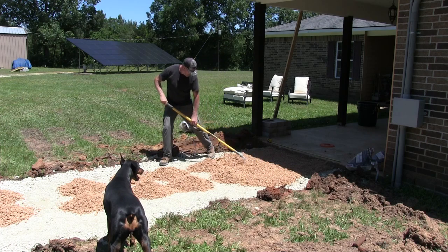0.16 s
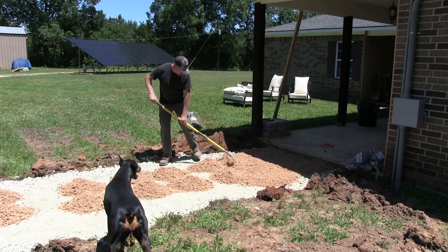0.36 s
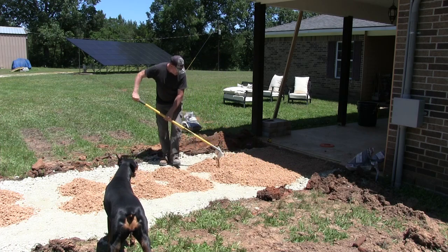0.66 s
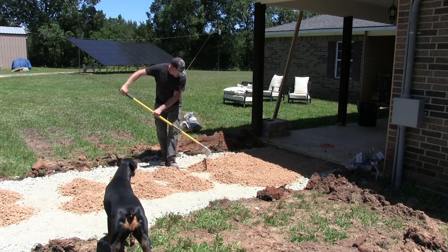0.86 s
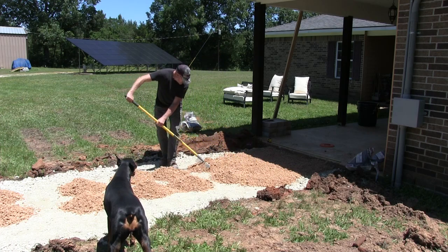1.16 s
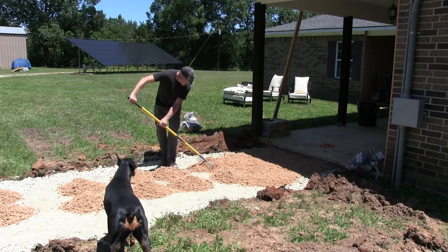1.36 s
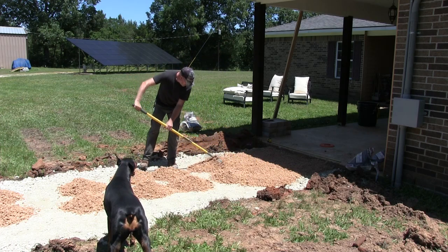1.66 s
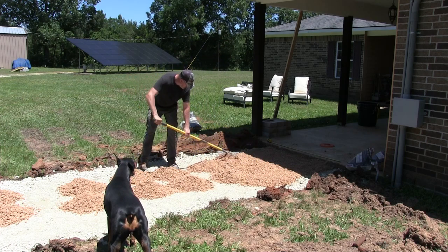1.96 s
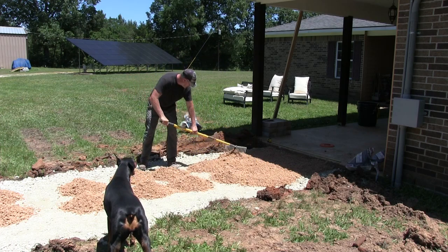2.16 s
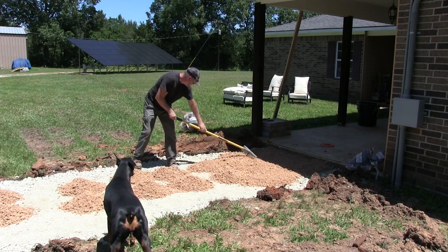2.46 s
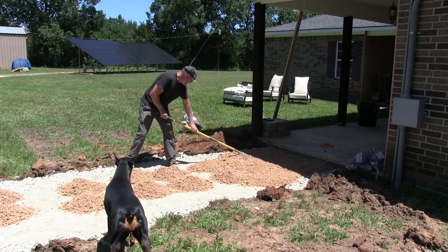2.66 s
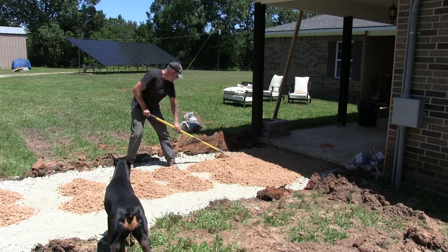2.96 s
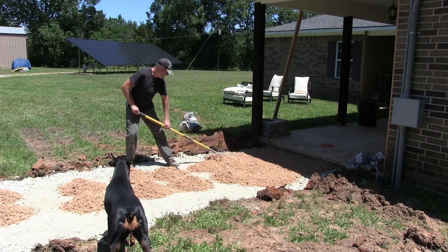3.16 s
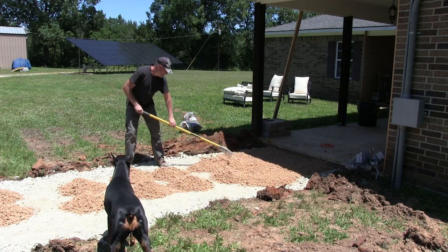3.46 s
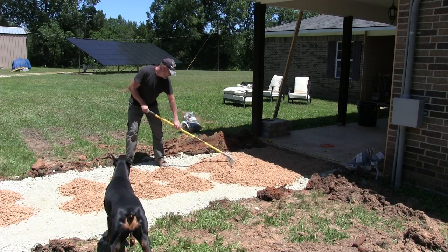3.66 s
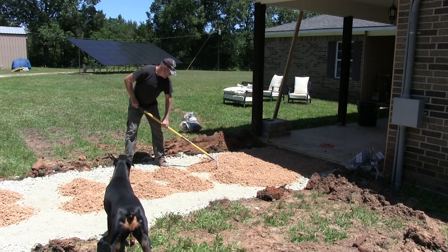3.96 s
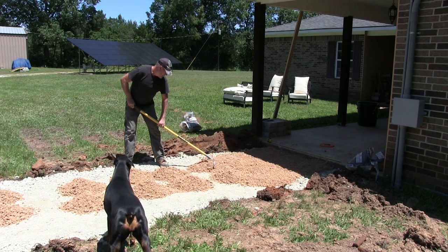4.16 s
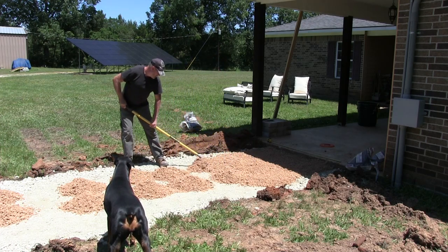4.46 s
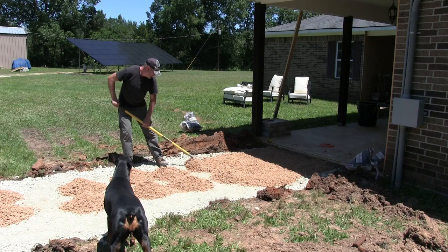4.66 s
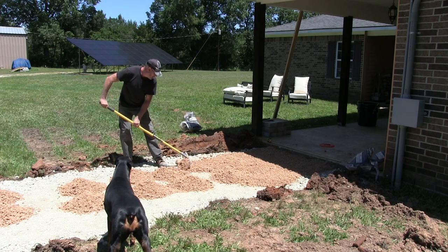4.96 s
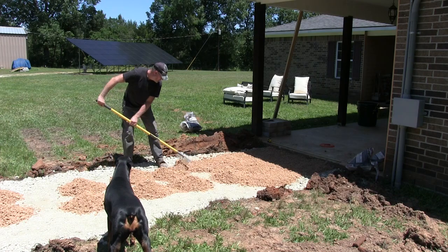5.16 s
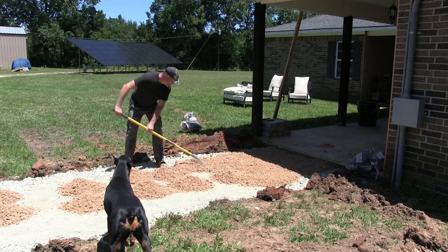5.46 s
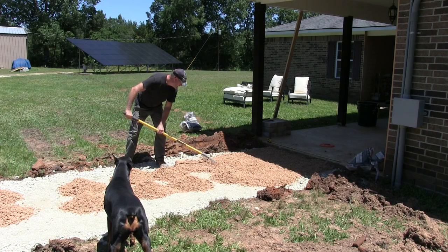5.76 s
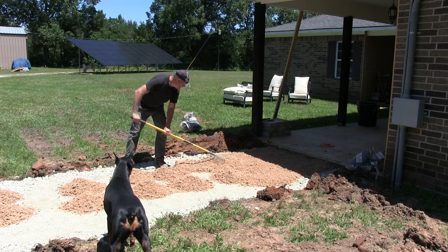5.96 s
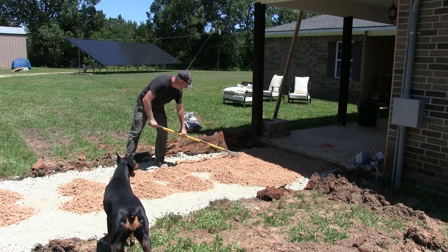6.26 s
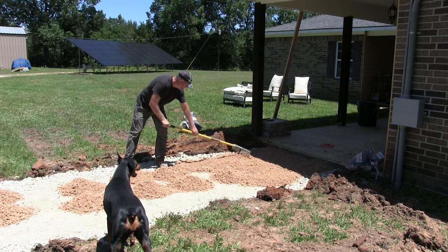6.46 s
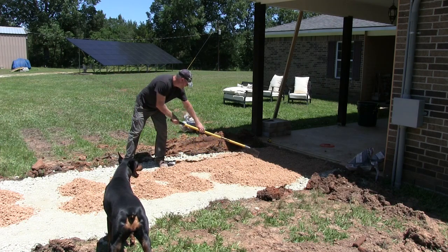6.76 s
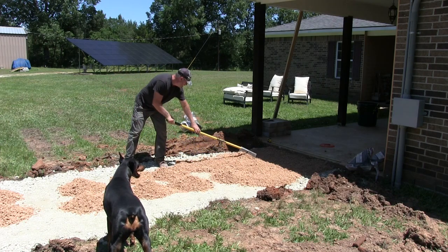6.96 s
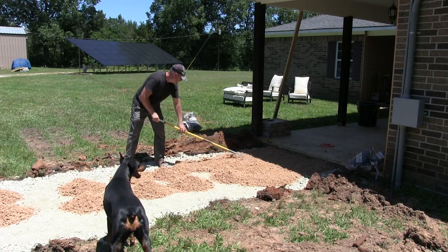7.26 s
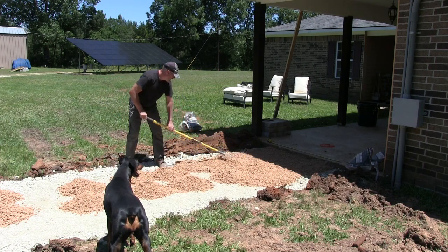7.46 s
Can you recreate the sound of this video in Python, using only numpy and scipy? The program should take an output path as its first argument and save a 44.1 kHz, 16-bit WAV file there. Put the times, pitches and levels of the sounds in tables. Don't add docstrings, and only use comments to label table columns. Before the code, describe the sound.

Short gritty rake strokes through loose gravel, with sharp tine knocks and stone clatter, over a quiet yard with distant birdsong and steady insect trill.

```python
import sys
import numpy as np
from scipy import signal
from scipy.io import wavfile
from scipy.ndimage import uniform_filter1d

SR = 44100
rng = np.random.default_rng(int(sys.argv[2]) if len(sys.argv) > 2 else 0)


def output_pcm(signal):
    pcm = np.clip(np.atleast_2d(signal).T, -1, 1) * 32767
    wavfile.write(sys.argv[1], SR, np.round(pcm).astype(np.int16))


def undo_db(level):
    steps = np.asarray(level, float) / 20
    return 10 ** steps


N = 335600


def evened(x):
    return x / np.sqrt(np.mean(x ** 2) + 1e-20)


def read(points, hz):
    f, value = np.transpose(points)
    return np.interp(np.log(hz + 1), np.log(f + 1), value)


def add(mix, s, sound):
    part = mix[round(s * SR):][:len(sound)]
    part += sound[:len(part)]


def panned(x, pan_db):
    return x * undo_db(np.array([[pan_db / 2], [-pan_db / 2]]))


def tail(x, t60, start_s):
    t = np.arange(SR // 2) / SR
    taps = rng.standard_normal((2, len(t))) * (rng.random((2, len(t))) < .06)
    taps = taps * undo_db(-60 * t / t60) * (t > start_s)
    return signal.fftconvolve(x[None], taps / np.linalg.norm(taps[0]), axes=1)[:, :N]


def ring(x, hz, t60):
    r = 10 ** (-3 / (max(t60, .002) * SR))
    w = 2 * np.pi * hz / SR
    return signal.lfilter([0, np.sin(w)], [1, -2 * r * np.cos(w), r * r], x)


def rake():
    # (frequency [Hz], level [dB], time to fall 60 dB [s])
    bed = [(436, -2, 0.012), (790, -4, 0.015), (986, -1, 0.019), (1340, 2.5, 0.007)]
    stones = [(1360, -2, 0.011), (1460, -6, 0.025), (1628, 4.5, 0.019), (1700, 0, 0.027), (1830, 2, 0.023),
              (1990, -1, 0.017), (2100, -5, 0.015), (2440, 2, 0.019)]
    long_tines = [(2475, 1, 0.022), (2950, 1, 0.048), (3000, -6, 0.022), (3120, -12, 0.02)]
    short_tines = [(3750, 6.5, 0.0058), (3980, -1.5, 0.021), (4290, -3, 0.013), (4680, -8, 0.034),
                   (4930, -6, 0.02), (5056, 3.5, 0.012), (5290, -6, 0.017), (5495, -7.5, 0.029),
                   (5750, -3.5, 0.012), (6350, -17.5, 0.07), (6920, -1, 0.013), (8550, -0.5, 0.0054),
                   (13100, -43, .012)]
    part_pan_db = [
        -1.5,
        2.3,
        0.79,
        0.13,
    ]
    *levels_db, tine_hz, stone_hz, sand_db = strokes()

    clumps = evened(uniform_filter1d(rng.standard_normal(N), 350))
    contacts_per_s = 3800 * undo_db(2.5 * clumps)
    at = np.flatnonzero(rng.random(N) < contacts_per_s / SR)
    sizes = undo_db(2.31 * np.minimum(rng.exponential(1, len(at)), 4))

    when, db, stones_db, long_db, low_hz, high_hz = knocks(tine_hz)
    bed_db = 0.47 * stones_db - 11
    knock_db = db + np.array([bed_db, stones_db, long_db, 0 * db])
    lag = .0022 * rng.exponential(1, (len(when), 12)) * (np.arange(12) > 0)
    bounce = undo_db(-1000 * lag - 6.0 * (lag > 0))
    bounce_at = np.minimum(((when[:, None] + lag) * SR).astype(int), N - 1)

    # (tones, favoured Hz in strokes, favoured Hz in knocks, width in log frequency, lumpiness dB)
    parts = [(bed, stone_hz, low_hz, .2, 3.0), (stones, stone_hz, low_hz, .14, 3.0),
             (long_tines, np.full(N, 2960.0), low_hz, .08, 1.5), (short_tines, tine_hz, high_hz, .08, 2.0)]
    dry = np.zeros((2, N))
    for k, (modes, stroke_hz, knock_hz, width, lumpy_db) in enumerate(parts):
        rub = rubbing(modes, levels_db[k][at], stroke_hz[at], width, lumpy_db, at)
        blow = striking(modes, knock_db[k], knock_hz)
        part = ringing_part(modes, at, rub * sizes, bounce_at, blow[:, :, None] * bounce)
        dry += panned(part, part_pan_db[k])
    soft_hz = 8800
    dry = signal.sosfilt(signal.butter(2, soft_hz, fs=SR, output="sos"), dry)

    specks = np.zeros(N)
    specks[at] = undo_db(levels_db[3][at] + sand_db[at] - 12.0) * sizes
    knock_grit = undo_db(db + sand_db[bounce_at[:, 0]] - 10.0)
    np.add.at(specks, bounce_at, knock_grit[:, None] * bounce)
    dry += grit(specks)
    return dry + undo_db(-14.5) * tail(dry.mean(0), 0.063, .004)


def favour(hz, centre_hz, width, lift_db):
    return undo_db(lift_db * np.exp(-(np.log(hz / centre_hz) / width) ** 2))


def rubbing(modes, level_db, stroke_hz, width, lumpy_db, at):
    hz, mode_db, t60 = np.transpose(modes)[:, :, None]
    tumble_db = lumpy_db * evened(uniform_filter1d(rng.standard_normal(N), 220))[at]
    tumble_db = tumble_db - 0.14 * lumpy_db ** 2
    chance_db = 2.0 * np.minimum(rng.exponential(1, len(at)), 4)
    rub = undo_db(mode_db) * favour(hz, stroke_hz, width, 6.9)
    loudness = np.sqrt((rub ** 2 * t60 / 0.028).sum(0))
    return rub * undo_db(level_db + tumble_db - 13.0 + chance_db) / loudness


def striking(modes, knock_db, knock_hz):
    hz, mode_db, t60 = np.transpose(modes)[:, :, None]
    blow = undo_db(mode_db) * np.sqrt(t60) * favour(hz, knock_hz, .07, 11.0)
    return blow * undo_db(knock_db - 5.0) / np.sqrt((blow ** 2).sum(0))


def ringing_part(modes, at, rubs, bounce_at, blows):
    out = np.zeros(N)
    for (hz, _, t60), rub, blow in zip(modes, rubs, blows):
        push = np.zeros(N)
        push[at] = rub * rng.standard_normal(len(at))
        np.add.at(push, bounce_at, blow * rng.choice([-1., 1.], blow.shape))
        out += ring(push, hz, t60)
    lowest_hz = min(hz for hz, _, _ in modes)
    return signal.sosfilt(signal.butter(2, lowest_hz * 0.68, "high", fs=SR, output="sos"), out)


def grit(specks):
    swell = np.sqrt(signal.lfilter([1], [1, -.97], specks ** 2))
    hiss = rng.standard_normal((2, N)) * swell
    band = signal.butter(2, [6500, 12400], "band", fs=SR, output="sos")
    return signal.sosfilt(band, hiss + 0.45 * hiss[::-1]) * 0.28


def strokes():
    # (start [s], rise [s], hold [s], fall [s], pressure [dB])
    skims = [
        (0, 0.0006, 0.0044, 0.12, -40.5),
        (.03, 0.071, 0.025, 0.24, -46.5),
        (.12, 0.16, 0.12, 0.28, -51),
        (.45, .14, .02, 0.24, -57),
        (1.21, 0.018, .01, 0.25, -49.5),
        (7.4, 0.14, 0.2, 0.17, -49.5),
    ]
    combs = [
        (1.252, 0.32, 0.25, .2, -59),
        (2.796, 0.16, 0.17, 0.24, -52.5),
        (2.99, 0.1, 0.054, 0.13, -64),
        (2.6, 0.046, 0.15, 0.15, -51),
        (5.447, 0.18, 0.34, 0.23, -59.5),
        (7.046, 0.2, 0.018, 0.32, -49.5),
    ]
    pulls = [
        (1.43, 0.24, 0.024, 0.17, -57.5),
        (1.595, 0.17, 0.018, 0.47, -49),
        (1.778, .14, .01, 0.16, -42),
        (6.2, 0.18, 0.076, 0.22, -53),
        (2.487, 0.014, .005, 0.12, -47.5),
        (2.612, 0.043, 0.1, 0.096, -49.5),
        (5.803, 0.23, 0.1, 0.17, -48),
        (6.054, 0.16, 0.036, 0.39, -49.5),
        (6.865, 0.046, 0.011, 0.29, -51),
        (6.947, 0.17, 0.047, 1, -53),
    ]
    shoves = [
        (1.798, 0.11, 0.034, 0.29, -55),
        (1.846, 0.22, 0.11, 0.03, -48.5),
        (6.143, 0.24, 0.053, .13, -55.5),
        (7.22, 0.12, 0.017, 0.16, -56.5),
        (7.465, 0.6, 0.15, 0.3, -51),
    ]
    digs = [
        (1.195, 0.013, 0.0062, 0.052, -37.5),
        (5.38, 0.012, 0.085, 0.55, -42.5),
        (5.412, 0.099, 0.052, 0.27, -48.5),
    ]
    sweeps = [
        (3.746, 0.012, 0.01, 0.17, -45),
        (3.761, 0.043, 0.14, 0.21, -47),
    ]
    glides = [
        (4.2, 0.2, 0.23, 0.36, -55.5),
        (4.9, 0.087, 0.17, 0.1, -60.5),
    ]
    # (bed [dB], loose stones [dB], long tines [dB], short tines [dB])
    stirs = [
        (-4.5, -8.5, -7, -2),
        (-6.5, 0.5, 2, 0.5),
        (-9, 1, -7, -4),
        (3.5, -2.5, -11, -2.5),
        (-8, -5, -4, -1.5),
        (-5, -6, -9.5, -1),
        (-10, -12, -15, -2),
    ]
    # (tine pitch [Hz], moving stones' pitch [Hz], share of fine grit [dB])
    touches = [
        (4910, 1780, 8.5),
        (4700, 1910, 8),
        (4350, 2140, 7),
        (4900, 1410, 7),
        (4460, 2000, 0),
        (5050, 900, 9),
        (5000, 1800, 7),
    ]
    ramp_db, rest_db = 29.5, -80

    t = np.arange(0, N / SR + .002, .001)
    push = np.zeros((len(stirs), len(t)))
    for k, rows in enumerate([skims, combs, pulls, shoves, digs, sweeps, glides]):
        for start, rise, hold, fall, db in rows:
            rise, fall = max(rise, .001), max(fall, .001)
            since_top = t - start - rise
            up = np.minimum(since_top / rise, 0)
            down = np.maximum((since_top - max(hold, 0)) / fall, 0)
            push[k] += undo_db(db + ramp_db * (up - down)) ** 2
    push += undo_db(rest_db) ** 2 / 4
    levels_db = 10 * np.log10(undo_db(np.transpose(stirs)) ** 2 @ push)
    touch = np.transpose(touches) @ push / push.sum(0)
    return [np.interp(np.arange(N) / SR, t, row) for row in (*levels_db, *touch)]


def knocks(tine_hz):
    # (time [s], short tines peak [dB], long tines against it [dB], tine pitch [Hz])
    tine_knocks = [(.0316, -38.5, 6.5, 5050), (.1301, -58, -9, 4870), (.3621, -37, -6, 5700),
                   (.417, -43, -19, 5160), (.4723, -35.5, -11, 5450), (1.1982, -36, -17, 5500),
                   (1.2096, -17, -4.5, 4290), (1.2155, -25.5, -16, 4680), (2.0602, -35, 3, 5090),
                   (2.6343, -37, -1.5, 4300), (2.8305, -38.5, -3, 3780), (2.9582, -32, -13, 5140),
                   (3.0155, -27.5, -0.5, 3750), (3.1218, -37, -8, 4900), (3.3084, -48, -5.5, 6700),
                   (.165, -36.5, -8, 5140), (3.8905, -54, -8, 4860), (5.3896, -27, -4, 5900),
                   (5.4066, -28, -19, 5400), (5.434, -29, -12, 4900), (5.443, -31.5, 2, 4900),
                   (6.1867, -36.5, -2, 3950), (7.3238, -43, -1, 4980), (7.339, -35, 1, 5850),
                   (7.3961, -39.5, -6, 5300), (7.457, -34, 4, 5200), (7.5692, -27, -4.5, 6950),
                   (1.6262, -36, -5, 5010), (7.5528, -43, -11, 4960), (3.759, -34.5, -16, 5050),
                   (3.773, -47, -12, 5050), (3.81, -38, -14, 5000), (3.829, -39, -12, 5050),
                   (4.42, -45, -15, 5200), (4.575, -43, -15, 5070), (4.61, -55, -15, 5100),
                   (5.07, -50, -15, 5050), (7.407, -43, -6, 5700), (2.672, -40, -4, 4800)]
    end_knocks = [
        (.5232, -28.5, -2.5, 5050),
        (.526, -34, -13, 6920),
        (.7023, -47, -3, 4760),
        (3.7539, -29, -6, 5030),
        (3.8486, -35, 1.5, 4760),
    ]
    # (time [s], peak [dB])
    pings = [(1.654, -37.5), (1.681, -44), (1.8145, -44), (2.668, -34), (2.6907, -37), (2.723, -41),
             (2.753, -42), (2.9176, -36), (2.9421, -43), (2.993, -38), (3.029, -47), (3.0824, -45),
             (3.0928, -38), (5.4063, -33.5), (5.462, -38), (5.486, -28), (5.499, -34), (5.507, -33.5),
             (5.5395, -32), (5.5896, -41), (5.6423, -44), (5.6941, -47), (5.741, -41.5), (5.9366, -38),
             (5.994, -34.5), (7.1518, -53), (7.2247, -41), (7.2466, -39), (7.4256, -42), (7.507, -46.5),
             (7.5334, -39.5)]
    # (time [s], peak [dB], short tines against it [dB], stone pitch [Hz])
    clacks = [(1.652, -37.5, -8, 2000), (1.7327, -34.5, -22, 2010), (1.7577, -27.5, -14, 2440),
              (1.8978, -36, -1, 1830), (1.777, -28, -19, 2380), (1.79, -39, -15, 1700),
              (1.814, -49, -10, 1600), (1.983, -40, -2, 1820), (2.138, -46, -9, 1430),
              (2.691, -48, 7, 1830), (3.16, -41.5, -18, 1460), (1.922, -24.5, -7, 2020),
              (1.9566, -28, -10, 1720), (2.118, -48, -10, 1400), (2.1545, -34.5, -1.5, 1600),
              (2.5021, -35, -16, 2500), (5.463, -28, -9, 1700), (6.0845, -33.5, -1, 1820),
              (6.112, -32.5, -15, 1700), (6.062, -38, -22, 1770), (6.169, -36, -17, 1830),
              (6.036, -39, -14, 1830), (6.2063, -29, -8, 1700), (6.2245, -29, -7, 1620),
              (6.2948, -34.5, -10, 1980), (6.3743, -29.5, -13, 1830), (6.396, -23.5, -15, 1900),
              (6.867, -43, -9, 1830), (6.898, -37, -15, 1830), (1.837, -46, -12, 1550),
              (1.853, -37, -2, 1600), (1.916, -39, -10, 1920), (2.0103, -36.5, -13, 1460),
              (2.037, -49, -17, 1510), (2.097, -49, 9, 1400), (2.652, -37, -8, 1790),
              (2.769, -32, -9, 1780), (3.792, -40.5, 0, 1000), (3.888, -53, -11, 1000),
              (5.42, -38, -10, 1750), (6.263, -33, -10, 2010), (6.3593, -33, -17, 1700),
              (6.423, -38, -12, 1790), (7.1064, -44, -16, 1750), (7.17, -40, -7, 1790),
              (7.195, -46, -12, 1850), (2.499, -41.5, -12, 1750), (2.513, -45, -11, 1780),
              (6.37, -36, -12, 1660), (5.446, -38, -10, 1000)]
    middle_hz, end_hz = 2950, 2440
    under_tines_db = -17
    short_under_ping_db, long_under_clack_db = -11, -8

    rows = []
    for blows, low_hz in ((tine_knocks, middle_hz), (end_knocks, end_hz)):
        for s, db, long_db, high_hz in blows:
            rows.append((s, db, under_tines_db, long_db, low_hz, high_hz))
    for s, db in pings:
        rows.append((s, db + short_under_ping_db, under_tines_db / 2, -short_under_ping_db,
                     middle_hz, tine_hz[int(s * SR)]))
    for s, db, short_db, hz in clacks:
        rows.append((s, db + short_db, -short_db, long_under_clack_db - short_db,
                     hz, tine_hz[int(s * SR)]))
    return np.transpose(rows)


def steps():
    # (time [s], peak [dB], pitch [Hz], time to fall 60 dB [s])
    thuds = [
        (0.032, -47, 185, 0.15),
        (0.528, -33, 94, 0.076),
        (1.798, -43.5, 235, 0.19),
        (3.13, -44, 198, 0.1),
        (3.471, -37.5, 190, 0.082),
        (5.029, -42, 216, 0.075),
        (5.389, -27, 530, 0.046),
    ]
    out, t = np.zeros(N), np.arange(SR // 5) / SR
    for s, db, hz, t60 in thuds:
        puff = evened(ring(rng.standard_normal(len(t)), hz, 6.2 / hz))
        add(out, s, undo_db(db - 60 * t / t60) * np.minimum(t / 0.018, 1) * puff)
    return out


def insect():
    # (time [s], wing strokes gained on a steady beat [strokes])
    wing_lag = [(0.0, -0.49), (0.8, -0.79), (1.6, -1.08), (2.4, -1.27), (3.2, -1.41), (4.0, -1.4),
                (4.8, -1.43), (5.6, -1.35), (6.4, -1.22), (7.2, -1.11), (7.6, -1.06)]
    # (share of the cycle [cycles], pitch [Hz], level [dB])
    wing = [
        (-.35, 9750, -20),
        (-.27, 9880, -3),
        (-.17, 10130, 0),
        (-.02, 10400, -1),
        (.1, 10310, 0),
        (.22, 9900, -1),
        (.32, 9450, -2),
        (.4, 9250, -20),
    ]
    wing_per_s, insect_db = 68.8, -58
    t = np.arange(N) / SR
    turns = wing_per_s * t + np.interp(t, *np.transpose(wing_lag)) + .5
    share, hz, db = np.transpose(wing)
    u, stroke = turns % 1 - .5, (turns - turns.min()).astype(int)
    chance = rng.standard_normal((stroke.max() + 1, 2))
    pitch = np.interp(u, share, hz) * (1 + 0.00397 * chance[stroke, 0])
    level = undo_db(np.interp(u, share, db) + 0.29 * chance[stroke, 1])
    rasp = 1 + 0.17 * evened(uniform_filter1d(rng.standard_normal(N), 60))
    tone = np.sin(2 * np.pi * np.cumsum(pitch) / SR) * level * rasp
    tone = evened(tone) * undo_db(insect_db)
    return panned(tone, -6.0) + undo_db(-32) * tail(tone, 0.16, 0.0016)


def birds():
    # (delay [s], length [s], start [Hz], middle [Hz], end [Hz], level [dB])
    rising = [
        (0, .08, 2306, 2630, 3100, 5),
        (.155, 0.028, 2907, 3450, 3740, 6),
    ]
    falling = [
        (0.0018, 0.062, 2950, 2710, 2610, 4.5),
        (.055, 0.048, 2550, 2400, 2200, -1),
    ]
    dipping = [
        (0, 0.023, 2120, 2110, 2120, -9),
        (.06, 0.069, 2790, 2430, 2640, -4.5),
        (.198, .028, 3050, 2850, 2790, -8),
    ]
    slow_fall = [
        (0.0098, .105, 2950, 2720, 3200, 0),
    ]
    # (time [s], level [dB])
    rising_at = [(0.792, -67), (1.037, -66), (1.288, -63), (1.531, -63), (1.785, -72), (2.041, -64),
                 (5.656, -60), (5.903, -59), (6.157, -62), (6.4, -63), (6.65, -63)]
    last_rise = [
        (2.278, -64.5),
    ]
    falling_at = [
        (0.022, -56),
        (0.309, -56.5),
        (0.578, -59),
    ]
    dipping_at = [
        (4.241, -52),
        (4.738, -53),
    ]
    slow_fall_at = [
        (5.13, -63),
    ]

    hidden, clear = np.zeros((2, N))
    for song, times, place in ((rising, rising_at, clear), (rising[:1], last_rise, clear),
                               (falling, falling_at, hidden), (dipping, dipping_at, clear),
                               (slow_fall, slow_fall_at, clear)):
        for s, song_db in times:
            for delay, length, *hz, db in song:
                add(place, s + delay, whistle(length, hz, song_db + db))
    behind_trees = undo_db(-4.0) * panned(hidden, .5) + tail(hidden, 0.14, .001)
    in_open = panned(clear, .5) + undo_db(-18.0) * tail(clear, 0.078, .001)
    return behind_trees + in_open + undo_db(-7.0) * tail(hidden + clear, 0.35, 0.015)


def whistle(length, hz, db):
    u = np.linspace(0, 1, round(length * SR))
    drift = uniform_filter1d(rng.standard_normal((2, 6000)), 250) * np.sqrt(250)
    wobble, flutter = drift[:, :len(u)]
    eased = np.clip(u - 0.067 * np.sin(2 * np.pi * u), 0, 1)
    pitch = np.polyval(np.polyfit([0, .5, 1], hz, 2), eased)
    tone = np.sin(2 * np.pi * np.cumsum(pitch * (1 + 0.0087 * wobble)) / SR)
    tone = tone * undo_db(db + 1.8 * flutter - 1.6 * u)
    return np.sqrt(2) * tone * signal.windows.tukey(len(u), .35)


def motor():
    # (time [s], level [dB])
    loudness = [
        (0, -77),
        (.8, -62),
        (1.298, -67.5),
        (3.5, -74),
        (7.61, -82),
    ]
    hum = ring(ring(rng.standard_normal((2, N)), 85.0, 0.17), 73, 0.049)
    level_db = np.interp(np.arange(N) / SR, *np.transpose(loudness))
    return evened(hum + 1.6 * hum[::-1]) * undo_db(level_db)


def yard():
    # (frequency [Hz], level per Hz [dB])
    air_colour = [(20, -43), (70, -2), (140, 0), (200, -2.5), (500, 0.5), (860, -4.5), (1800, -9),
                  (2780, -9.5), (5000, -16), (7600, -18), (10300, -10), (10900, -21.5), (12500, -29),
                  (15700, -27)]
    # (frequency [Hz], likeness [0 to 1])
    likeness = [
        (60, 1),
        (150, 0.69),
        (380, 0.41),
        (950, 0.37),
        (2380, 0.39),
        (5980, 0.68),
        (15000, 0.57),
    ]
    # (centre [Hz], width [Hz], level [dB])
    chorus = [
        (2680, 230, -66.5),
        (9520, 500, -66),
    ]
    air_db = -53.5
    frames, hz = N // 256 + 5, np.fft.rfftfreq(1024, 1 / SR)
    a, b, c, d, patches = rng.standard_normal((frames, 513, 5)).T
    patches = evened(uniform_filter1d(uniform_filter1d(patches, 10, 0), 14, 1))
    size = undo_db(air_db) * evened(undo_db(read(air_colour, hz)))
    for centre, width, db in chorus:
        size = np.hypot(size, undo_db(db) * evened(np.exp(-((hz - centre) / width) ** 2)))
    same = np.clip(read(likeness, hz), -1, 1)[:, None]
    left = a + 1j * b
    right = same * left + np.sqrt(1 - same ** 2) * (c + 1j * d)
    spectra = np.array([left, right]) * size[:, None] * undo_db(1.46 * patches)
    sound = signal.istft(spectra, nperseg=1024, noverlap=768)[1][:, :N]
    return evened(sound) * np.sqrt(np.mean(size ** 2))


def scene():
    return rake() + steps() + insect() + birds() + motor() + yard()


def band_limit(x):
    return signal.sosfilt(signal.butter(12, 15810, fs=SR, output="sos"), x)


def record(dry):
    band = signal.sosfilt(signal.butter(2, 50, "high", fs=SR, output="sos"), dry)
    top_cut = signal.firwin(901, 15720, window=("kaiser", 9), fs=SR)
    band = signal.oaconvolve(band, top_cut[None], "same")
    return band_limit(band)


dry = scene()
out = record(dry)
output_pcm(out)
```